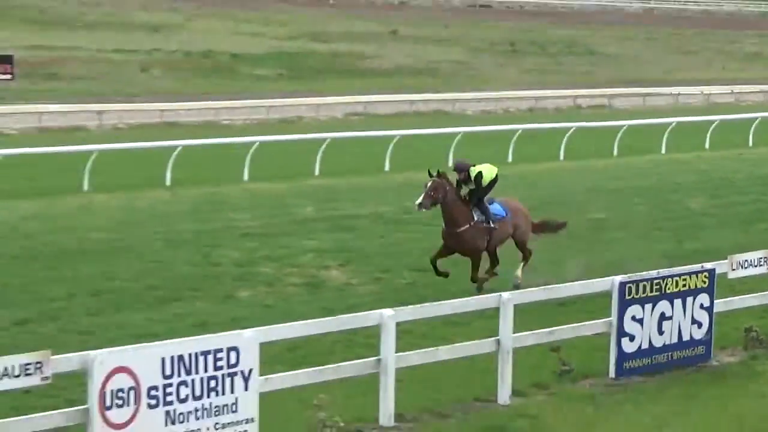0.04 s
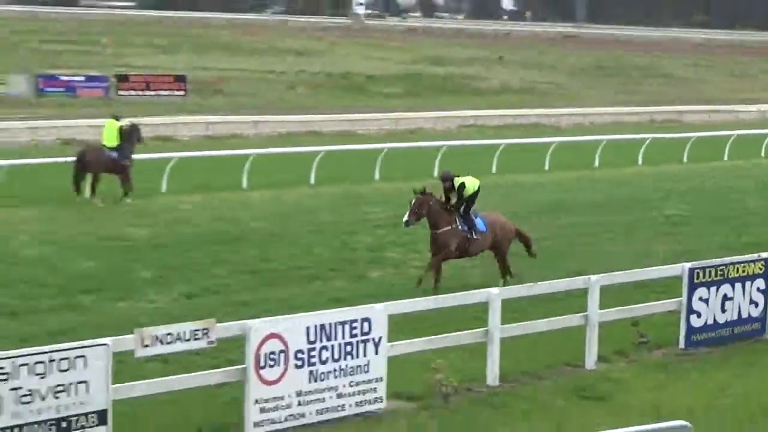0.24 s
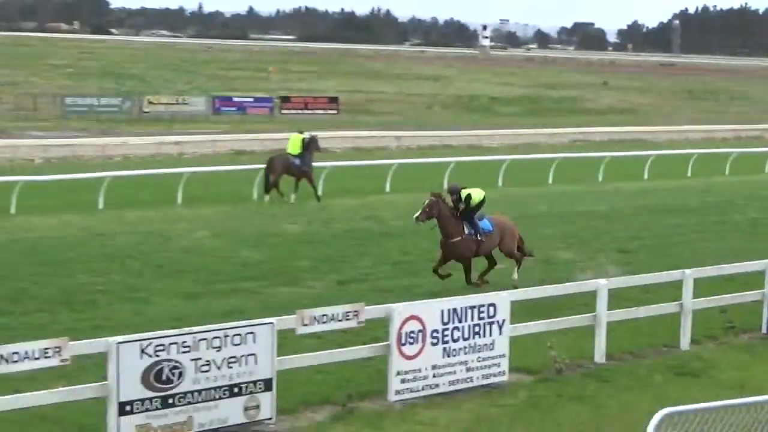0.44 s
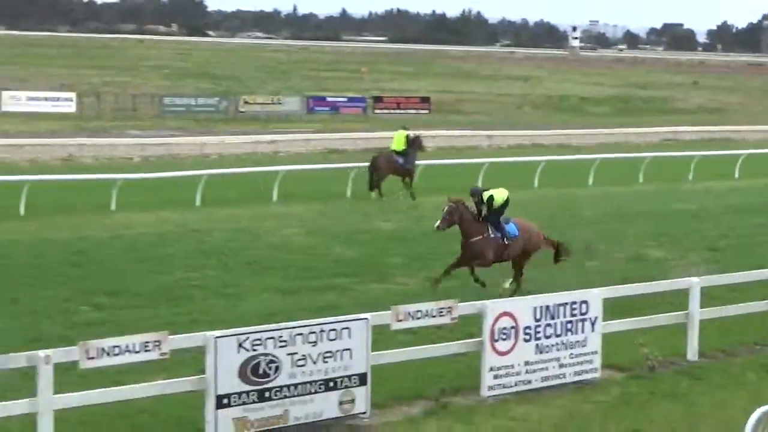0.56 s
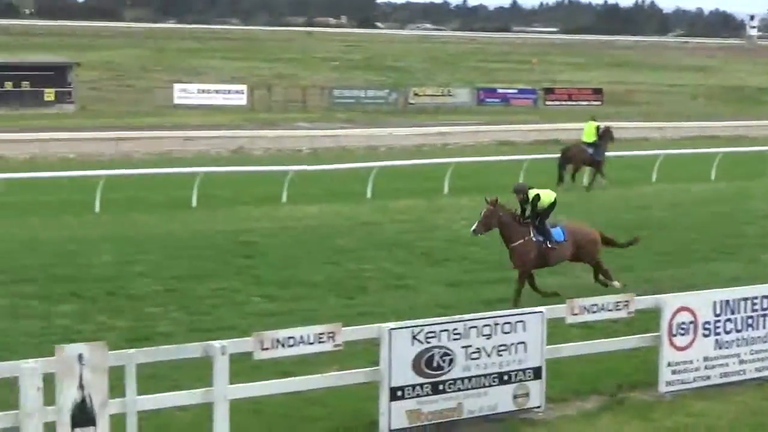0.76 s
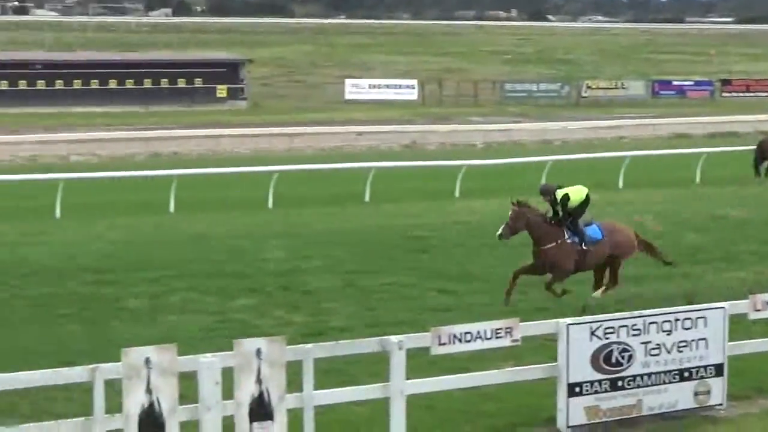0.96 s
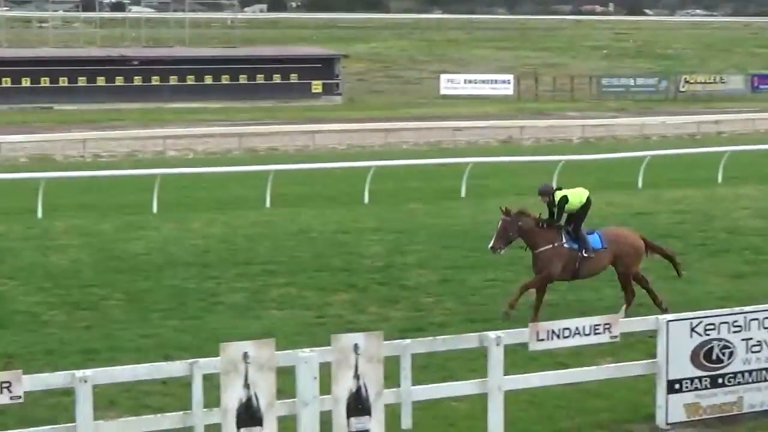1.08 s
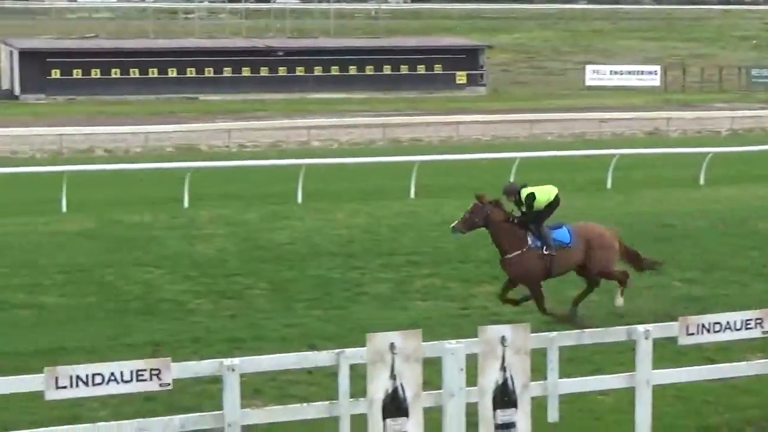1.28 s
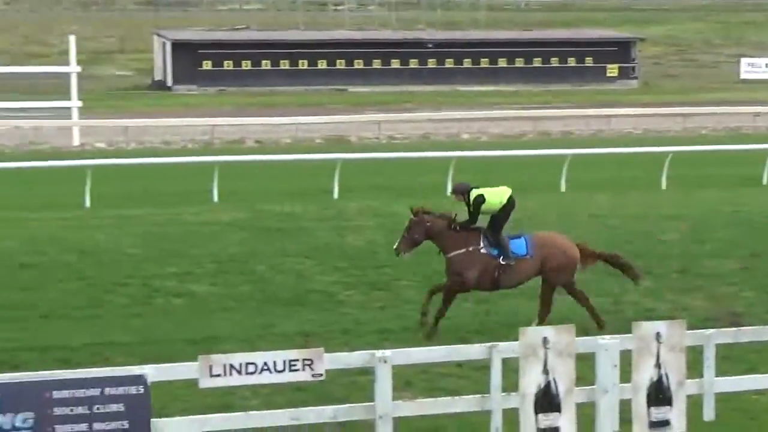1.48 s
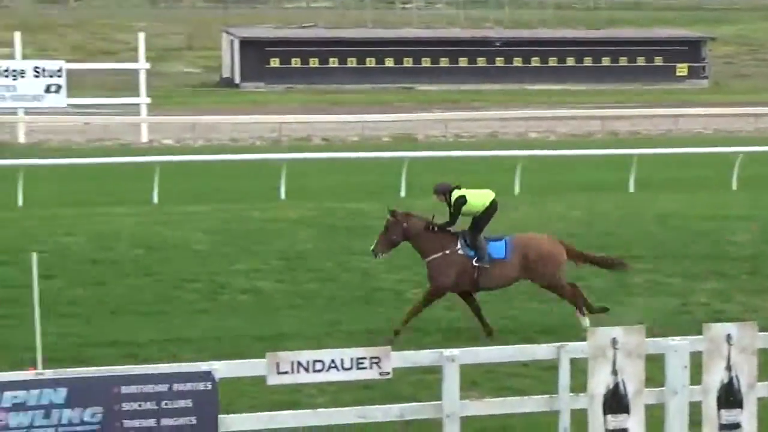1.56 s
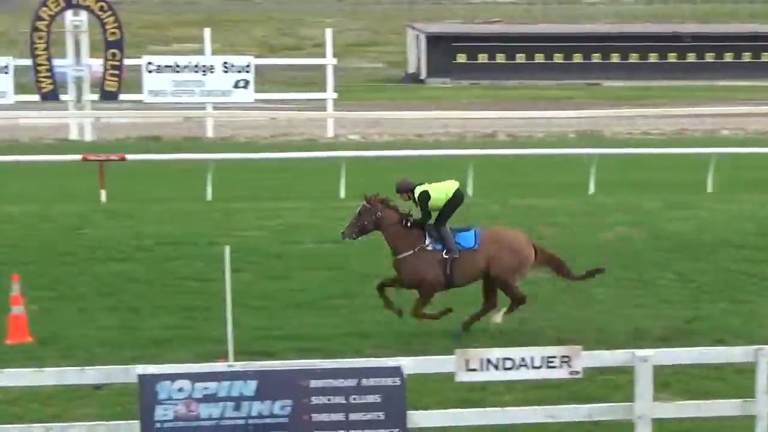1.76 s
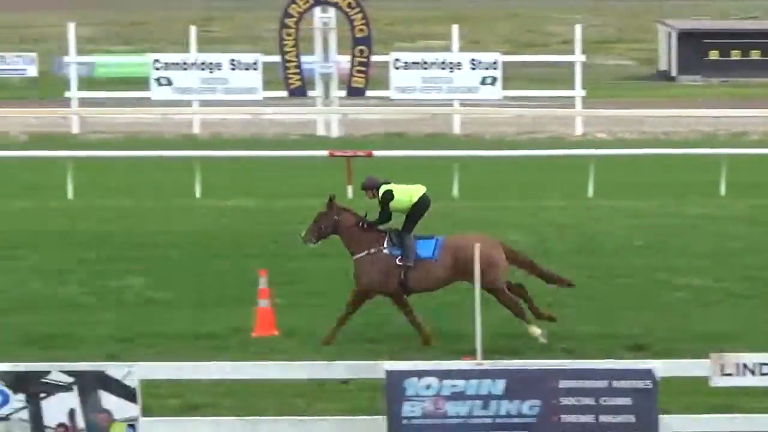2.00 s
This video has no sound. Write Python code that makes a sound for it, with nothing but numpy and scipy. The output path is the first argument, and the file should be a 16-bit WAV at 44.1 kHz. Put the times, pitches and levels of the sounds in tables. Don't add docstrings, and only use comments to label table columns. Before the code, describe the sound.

Galloping hooves thud and slap on grass as wind buffets the microphone and small birds chirp

```python
import sys
import numpy as np
from scipy import signal
from scipy.fft import rfft, irfft
from scipy.io import wavfile
from scipy.ndimage import uniform_filter1d

SR = 44100
rng = np.random.default_rng(int(sys.argv[2]) if len(sys.argv) > 2 else 0)


def wav_record(signal):
    frames = np.transpose(np.atleast_2d(signal))
    bounded = np.clip(frames, -1, 1)
    quanta = np.round(bounded * 32767).astype(np.int16)
    wavfile.write(sys.argv[1], SR, quanta)


def volts(x):
    e = np.asarray(x, float) / 20
    return 10 ** e


N = 89655


def evened(x):
    return x / np.sqrt(np.mean(x ** 2) + 1e-20)


def read(points, hz):
    f, value = np.transpose(points)
    return np.interp(np.log(hz + 1), np.log(f + 1), value)


def add(mix, s, sound):
    at = round(s * SR)
    sound = sound[max(-at, 0):]
    part = mix[max(at, 0):][:len(sound)]
    part += sound[:len(part)]


def noise(colour, same, patchy_db, size=512, low_db=-40):
    frames, hz = N * 4 // size + 5, np.fft.rfftfreq(size, 1 / SR)
    a, b, c, d, patches = rng.standard_normal((frames, len(hz), 5)).T
    patches = uniform_filter1d(patches, size=6, axis=0)
    patches = evened(uniform_filter1d(patches, size=8, axis=1))
    like = np.clip(read(same, hz), -1, 1)[:, None]
    left, other = a + 1j * b, c + 1j * d
    z = np.array([left, like * left + np.sqrt(1 - like ** 2) * other])
    outside = (hz < colour[0][0] * .9) | (hz > colour[-1][0] * 1.02)
    shape = read(colour, hz) + low_db * outside
    z *= volts(shape[:, None] + patchy_db * patches)
    return evened(signal.istft(z, nperseg=size, noverlap=size * 3 // 4)[1][:, :N])


def lumps(per_s):
    hz = np.fft.rfftfreq(N, 1 / SR)
    return evened(irfft(rfft(rng.standard_normal((2, N))) / (1 + (hz / per_s) ** 4), N))


# start_s, swish_db, slap_db, thud_db
HOOF_FALLS = [(0.379, -28, -26, -50), (0.5542, -48, -36, -14), (0.7701, -27, -46, -41),
              (0.7894, -26.5, -27, -9), (0.9122, -25.5, -25, -33), (0.934, -25.5, -41.5, -19),
              (1.1102, -33, -30, -16.5), (1.1844, -20, -24.5, -16), (1.1941, -29, -29, -21),
              (1.515, -19, -27, -17), (1.5947, -23.5, -24, -17), (1.6045, -25, -25, -13),
              (1.933, -19.5, -31.5, -57), (2.0167, -16.5, -23, -17)]
# start_s, level_db, ring_hz, sparkle_db
SHOE_CLICKS = [(0.3174, -17, 2100, -39), (0.318, -13, 1300, -45), (1.5185, -21, 850, -60),
               (1.527, -30, 2000, -60), (1.6042, -15, 800, -55), (1.704, -20, 1300, -50),
               (1.7626, -15, 2800, -34), (1.766, -40, 2500, -41), (2.0162, -17, 2500, -36),
               (2.0172, -19, 1250, -44)]
# freq_hz, level_db
SLAP_TONE = [(300, 16.5), (700, -0.5), (1500, -10), (3000, -5.5), (6000, -20)]
# freq_hz, level_db
GRASS_TONE = [(1300, 6), (2500, -0.5), (7000, 3), (10000, 8), (13000, -8.5)]


def hooves():
    thud_hz, thud_t60_s = 97, 0.048
    slap_s, slap_tail_s = 0.0028, 0.035
    swish_rise_s, swish_fall_s = 0.004, 0.0074
    click_turns, click_sag, spark_s = 7.0, 0.15, 0.00056
    t, u = np.arange(2000) / SR, np.arange(-600, 1400) / SR
    out, slap, swish, spark = np.zeros((4, N))

    push = np.sin(2 * np.pi * thud_hz * t) * volts(-60 * t / thud_t60_s)
    smack = np.minimum(t / 0.001, 1) * (np.exp(-t / slap_s) + 0.21 * np.exp(-t / slap_tail_s))
    sweep = np.where(u < 0, np.exp(u / swish_rise_s), np.exp(-u / swish_fall_s))
    for s, swish_db, slap_db, thud_db in HOOF_FALLS:
        add(out, s, volts(thud_db + 1.0) * push)
        add(slap, s, volts(slap_db + 2.0) * smack)
        add(swish, s - 500 / SR, volts(swish_db - 18.5) * sweep)

    for s, db, hz, spark_db in SHOE_CLICKS:
        decay = volts(db + 2.2 - 60 * t * hz / click_turns)
        sag = 1 - click_sag * np.tanh(t * hz / 3)
        add(out, s, decay * np.tanh(3 * t * hz) * np.sin(2 * np.pi * hz * t * sag))
        add(spark, s, volts(spark_db) * t / spark_s * np.exp(1 - t / spark_s))

    near = [(100, 0.63), (9000, 0.85)]  # (Hz, left-right likeness)
    thuds = out * volts([[-.5], [.5]])
    slaps = slap * noise(SLAP_TONE, near, 0.74)
    swishes = swish * noise(GRASS_TONE, near, 1.5)
    return thuds + slaps + swishes + spark * noise(GRASS_TONE, near, 1.0)


# freq_hz, likeness
AIR_LIKENESS = [(700, 0.83), (2500, 0.6), (6000, 0.89), (8000, 0.52), (11000, 1)]


def swells(table, colour):
    grit_per_s, grit_depth = 660, 0.71
    env = np.zeros(N)
    for s, length, db in table:
        u = np.arange(0, 1, 1 / (length * SR))
        add(env, s, volts(db) * np.sin(np.pi * u ** 0.41) ** 0.42)
    crumbs = np.minimum(rng.exponential(1, N), 1.6) * (rng.random(N) < grit_per_s / SR)
    grit = signal.lfilter([1], [1, -.985], crumbs)
    rough = env * (1 + grit_depth * grit) / 2
    return rough * noise(colour, AIR_LIKENESS, 2.15) * volts(1.6 * lumps(18)[0])


# start_s, length_s, level_db
BREATHS = [
    (.02, 0.077, -41),
    (.42, 0.12, -37),
    (.76, 0.22, -38),
    (1.24, 0.17, -36),
    (1.656, 0.24, -36.5),
]
# freq_hz, level_db
BREATH_TONE = [(500, 9.5), (1150, -10.5), (1700, -3.5), (2400, -4.5), (4000, -19), (12000, -28)]


def breath():
    return swells(BREATHS, BREATH_TONE)


# start_s, length_s, level_db
LEG_BRUSHES = [(.13, 0.29, -55), (.62, 0.18, -50), (1.04, 0.22, -48.5), (1.25, 0.26, -50.5),
               (1.45, 0.22, -50), (1.66, 0.28, -51), (1.9, 0.16, -49)]


def brushes():
    return swells(LEG_BRUSHES, GRASS_TONE)


# start_s, length_s, level_db
CLOD_FALLS = [(.12, 0.05, -49), (.89, 0.09, -46), (1.25, 0.061, -42), (1.3, .05, -40), (1.69, .09, -38)]
# freq_hz, level_db
CLOD_TONE = [(450, -1), (700, -13), (1150, 12.5), (1500, -13.5), (2500, -13)]


def clods():
    return swells(CLOD_FALLS, CLOD_TONE)


# start_s, level_db, tear_db (tearing of the upper edge)
GUSTS = [(0, -23, 8), (.15, -18, 2.5), (.28, -15.5, -3), (.34, -18.5, 2.5), (.47, -19.5, 5),
         (.62, -17.5, -2), (.74, -16.5, -8), (.8, -19.5, 5.5), (.92, -26.5, 3), (1.0, -17, -10.5),
         (1.15, -26.5, -7.5), (1.3, -21, -7), (1.45, -22, -1), (1.6, -15.5, -4), (1.72, -21.5, -4.5),
         (1.8, -24.5, -4), (2.03, -27.5, 1.5)]
# freq_hz, level_db per Hz
WIND_TONE = [(20, -49), (60, -1.5), (108, 0.5), (205, -5), (296, -7.5), (842, -30), (1010, -31),
             (1600, -45), (2080, -100)]
# freq_hz, likeness
WIND_LIKENESS = [(40, 1), (130, 0.63), (270, 0.21), (600, -0.29)]


def wind():
    lull_db = -3
    t = np.arange(N) / SR
    when, level_db, tear_db = np.transpose(GUSTS)
    db, tear = np.interp(t, when, level_db), np.interp(t, when, tear_db)
    x = noise(WIND_TONE, WIND_LIKENESS, 0.62, size=2048)
    low = signal.sosfiltfilt(signal.butter(2, 180, fs=SR, output="sos"), x)
    shared = lumps(55.0)[0]
    rumble = low * volts(1.2 * shared)
    edge = (x - low) * volts(tear + 1.6 * shared + 1.67 * lumps(37))
    return volts(db + lull_db) * (rumble + edge)


# start_s, peak_db, centre_hz
EDDY_HITS = [(0.112, -8.5, 169), (0.147, -11, 151), (0.162, -11, 208), (0.195, -7.5, 161),
             (0.258, -14, 140), (0.273, -8.5, 187), (0.293, -4.5, 192), (0.312, -15.5, 137),
             (0.365, -9.5, 242), (0.384, -4, 192), (0.429, -6.5, 197), (0.466, -10, 253), (0.495, -13, 167),
             (0.513, -13, 188), (0.559, -9.5, 173), (0.641, -5.5, 194), (0.704, -14, 134),
             (0.794, -15, 127), (0.809, -8.5, 165), (0.845, -10.5, 151), (0.881, -10, 178),
             (0.989, -10.5, 118.4), (1.022, -22, 180), (1.062, -13.5, 125), (1.116, -11, 147),
             (1.189, -8, 138), (1.252, -23, 158), (1.301, -14, 113), (1.322, -23, 173), (1.341, -17.5, 193),
             (1.377, -26, 131), (1.398, -29, 140), (1.454, -15.5, 130), (1.474, -12.5, 172),
             (1.52, -9, 129), (1.555, -10.5, 202), (1.575, -12, 157), (1.607, -13, 146), (1.652, -10, 140),
             (1.677, -15, 133), (1.698, -13, 163), (1.724, -13, 150), (1.784, -17, 138), (1.844, -14, 160),
             (1.868, -22, 180), (1.885, -16, 170)]


def eddies():
    level_db, side_rad, turns = -4, 0.62, 0.78
    out, t = np.zeros((2, N)), np.arange(-800, 800) / SR
    chances = rng.uniform(-1, 1, (len(EDDY_HITS), 2))
    for (s, db, hz), (turn, skew) in zip(EDDY_HITS, chances):
        bell = volts(db + level_db) * np.exp(-(t * hz / turns) ** 2)
        for port, sign in zip(out, (1, -1)):
            swing = np.cos(2 * np.pi * hz * t + turn + sign * side_rad * (1 + skew))
            add(port, s - 800 / SR, bell * swing)
    return out


def note(length, from_hz, to_hz, db, waver, phase):
    trill_hz, trill_depth, arch = 67.8, 0.33, 0.001
    t = np.arange(0, length, 1 / SR)
    glide = from_hz + (to_hz - from_hz) * t / length
    bend = arch / length * (np.sin(np.pi * t / length) - .6)
    hz = glide * (1 + waver[:len(t)] + bend)
    trill = 1 - trill_depth * np.sin(np.pi * trill_hz * t + phase) ** 2
    swell = np.sin(np.pi * t / length) ** 0.14
    return volts(db + 3.5) * trill * swell * np.sin(2 * np.pi * np.cumsum(hz) / SR)


def field(x):
    t60_s = 0.26
    t = np.arange(SR // 2) / SR
    tail = rng.standard_normal((2, len(t))) * volts(-60 * t / t60_s) * (t > .004)
    return signal.fftconvolve(x[None], tail / np.linalg.norm(tail[0]), axes=1)[:, :N]


# start_s, length_s, from_hz, to_hz, level_db
CLEAR_NOTES = [(.02, .04, 4200, 4200, -45), (.235, .06, 4300, 4400, -43), (.3, .035, 3550, 4050, -47),
               (.325, .04, 4400, 4300, -43), (.385, .04, 4580, 4400, -41), (.462, .035, 4700, 4400, -43),
               (.487, .035, 6900, 6300, -49), (.575, .03, 5900, 4700, -51), (.59, .022, 4400, 4420, -42),
               (.61, .047, 4150, 2850, -43), (.69, .065, 5750, 5000, -45), (1.0, .1, 5150, 5000, -47),
               (1.05, .06, 4000, 3920, -37), (1.06, .08, 6750, 6850, -55), (1.11, .05, 3500, 3100, -44),
               (1.11, .17, 5030, 5000, -48), (1.295, .09, 4000, 3650, -44), (1.305, .11, 6850, 6600, -53),
               (1.34, .2, 5000, 4985, -43), (1.59, .05, 4550, 4700, -46), (1.74, .08, 4950, 5100, -47),
               (1.895, .055, 3600, 2450, -48), (.793, .022, 3750, 3550, -43), (.895, .02, 4100, 4400, -45),
               (1.82, .045, 4200, 4750, -44), (.895, .03, 2400, 2500, -47)]
# start_s, length_s, from_hz, to_hz, level_db
BUZZY_NOTES = [(0, 0.093, 3540, 3654, -43.5), (0.17, 0.118, 5595, 5430, -43.5),
               (0.698, .055, 5550, 5120, -50), (0.505, 0.022, 3100, 3430, -42),
               (0.47, 0.035, 4100, 4005, -41), (0.671, 0.1, 3700, 3626, -45),
               (.74, 0.082, 2300, 2350, -47.5), (1.064, 0.085, 4280, 4134, -40),
               (1.138, 0.048, 3200, 3020, -38), (1.2, 0.047, 3400, 3340, -42),
               (1.379, .035, 3400, 3206, -36.5), (1.425, 0.041, 3200, 3386, -40.5),
               (1.915, 0.15, 5650, 5600, -52)]


def near_birds(waver):
    near, rasp = np.zeros(N), lumps(660)[0]
    for s, length, from_hz, to_hz, db in CLEAR_NOTES:
        wobble = 0.0084 * waver[round(s * SR / 2):]
        add(near, s, note(length, from_hz, to_hz, db + 0.24, wobble, 0.95))
    for s, length, from_hz, to_hz, db in BUZZY_NOTES:
        buzz = 0.056 * rasp[round(s * SR / 2):]
        add(near, s, note(length, from_hz, to_hz, db, buzz, 1.0))
    return near * volts(1.5 * lumps(70)[0])


# start_s, level_db, highest_hz
FLOCK_COURSE = [(0, -41.5, 5460), (0.172, -41, 6054), (.45, -44, 5650), (.56, -58, 5680),
                (0.681, -34, 5970), (0.851, -46, 5374), (0.999, -45.5, 5835), (1.12, -37.5, 5295),
                (1.45, -35.5, 5312), (1.649, -40, 5294), (1.849, -41, 5196), (2.03, -45, 5830)]


def far_flock(waver):
    count, low_hz, glide = 600, 2907, 0.263
    far = np.zeros(N)
    when, level_db, highest_hz = np.transpose(FLOCK_COURSE)
    for k, (a, b, c, d, e) in enumerate(rng.random((count, 5))):
        s = (k + a) / count * N / SR - .02
        hz = low_hz + b * (np.interp(s, when, highest_hz) - low_hz)
        to_hz = hz * (1 - glide * (d - .4) * 4 * b * (1 - b))
        db = np.interp(s, when, level_db) - 11 + 4.9 * e
        add(far, s, note(0.011 + 0.01986 * c, hz, to_hz, db, 0.0429 * waver[k * 100:], 6 * a))
    return far


def birds():
    field_db, pan_db = -3, -6
    waver = lumps(150)[0]
    near, far = near_birds(waver), far_flock(waver)
    direct = np.array([near + 0.6 * far, np.roll(near + 0.93 * far, 1)])
    smeared = volts(field_db) * field(near + 1.11 * far)
    return (direct + smeared) * volts([[pan_db / 2], [-pan_db / 2]])


# freq_hz, level_db per Hz
AIR_TONE = [(500, 4), (800, -0.5), (1900, -4.5), (3800, -1), (7800, -17.5), (9800, -17.5), (13000, -30)]


def air():
    return volts(-42) * noise(AIR_TONE, AIR_LIKENESS, 1.0)


def scene():
    horse = hooves() + breath() + brushes() + clods()
    return horse + wind() + eddies() + birds() + air()


def roll_off(x):
    return signal.sosfilt(signal.butter(12, 11570, fs=SR, output="sos"), x)


# freq_hz, level_db
BAND_EDGE = [(11000, 0), (11130, -34), (12300, -40), (13000, -80)]


def record(dry):
    hz = np.fft.rfftfreq(N, 1 / SR)
    cut = irfft(rfft(dry) * volts(read(BAND_EDGE, hz)), N)
    return roll_off(cut)


dry = scene()
out = record(dry)
wav_record(out)
```